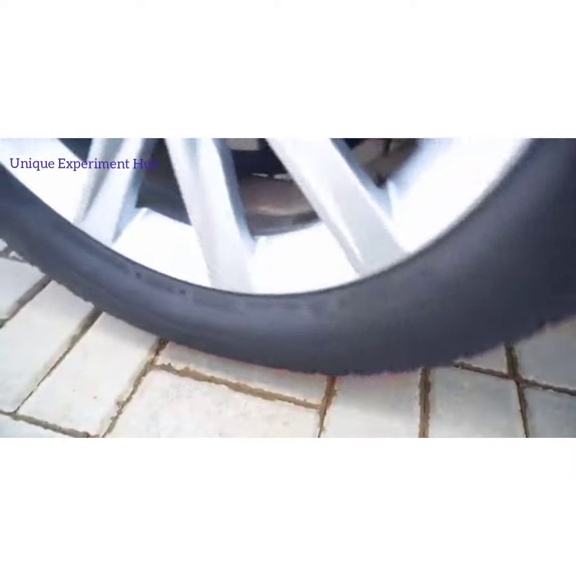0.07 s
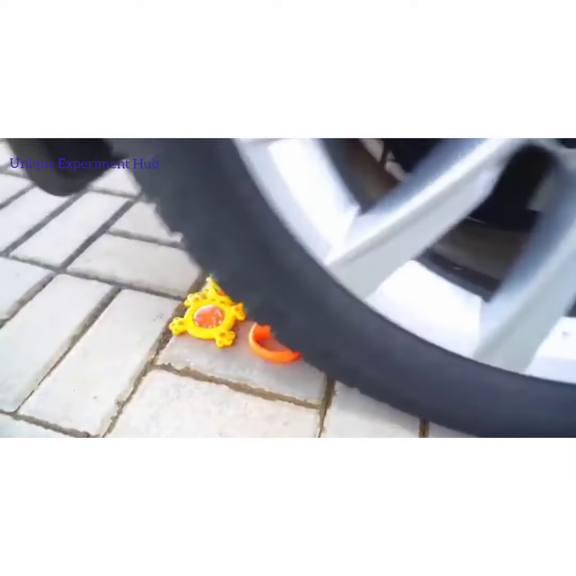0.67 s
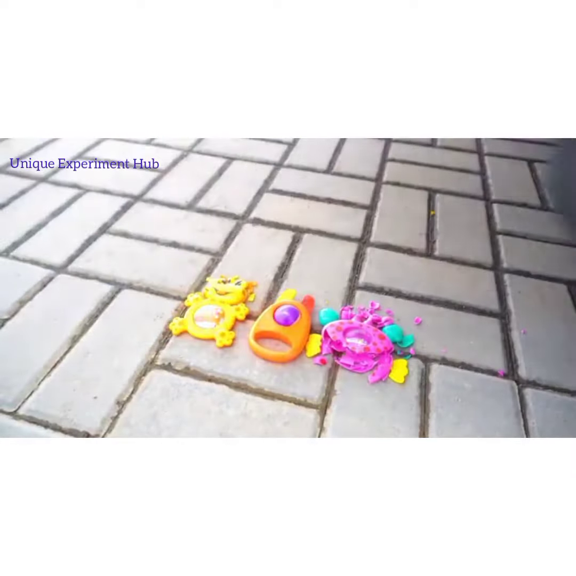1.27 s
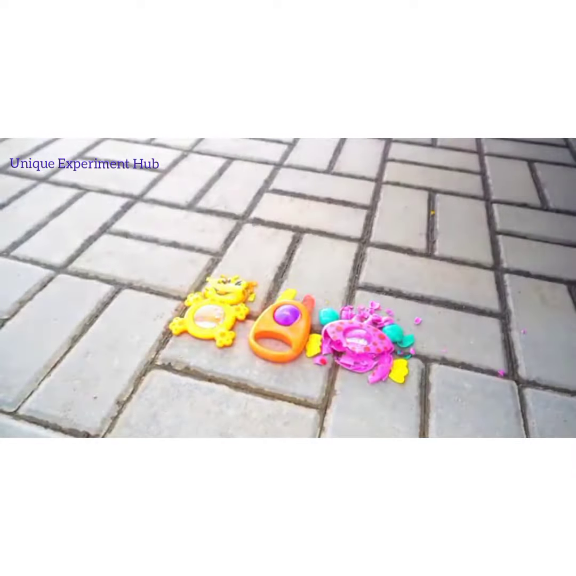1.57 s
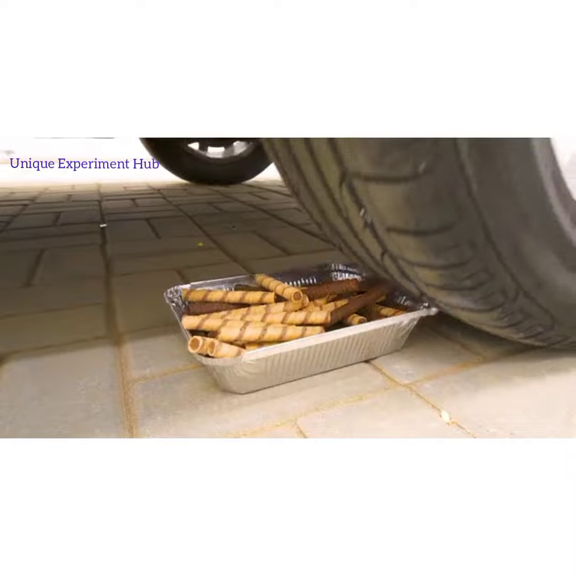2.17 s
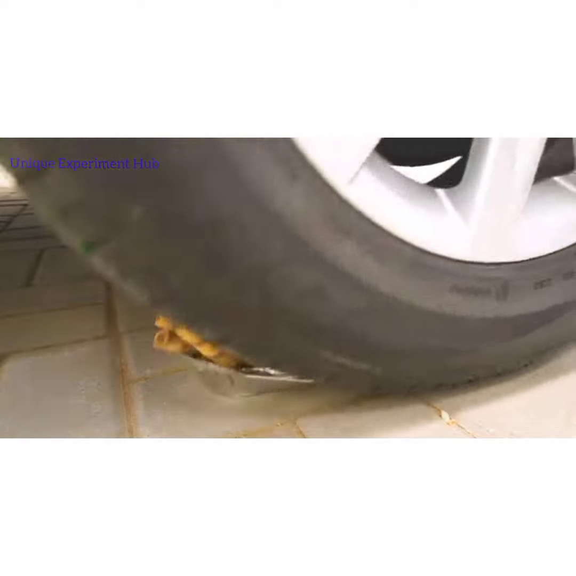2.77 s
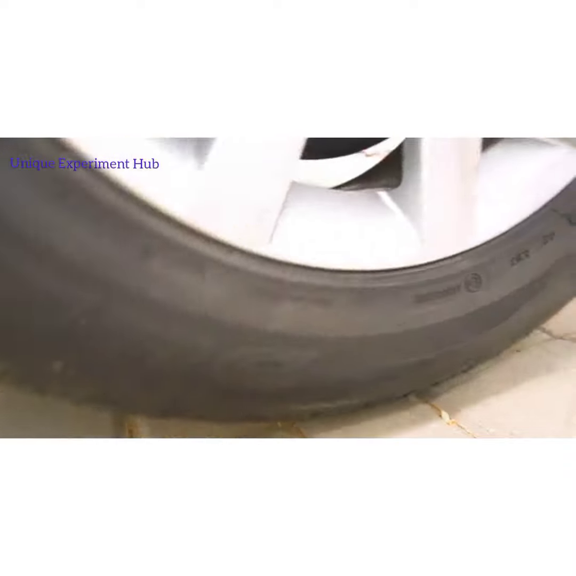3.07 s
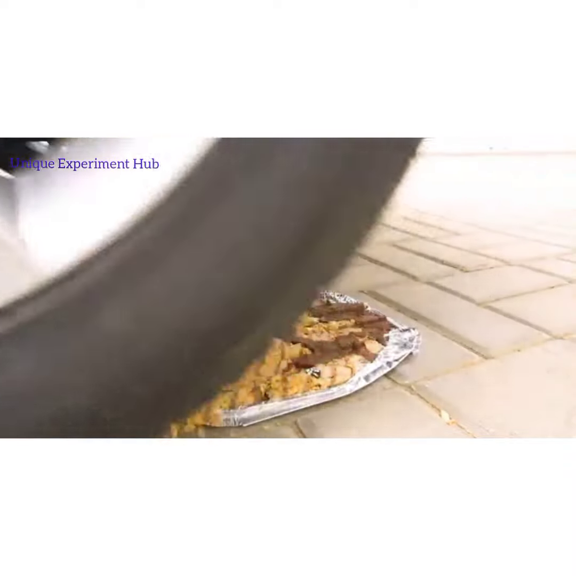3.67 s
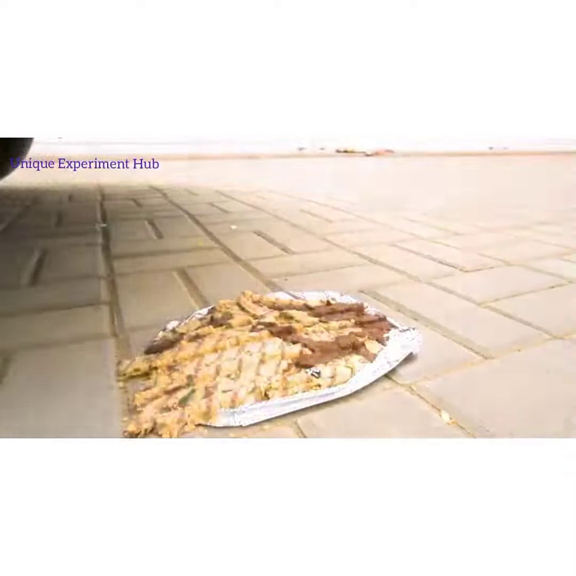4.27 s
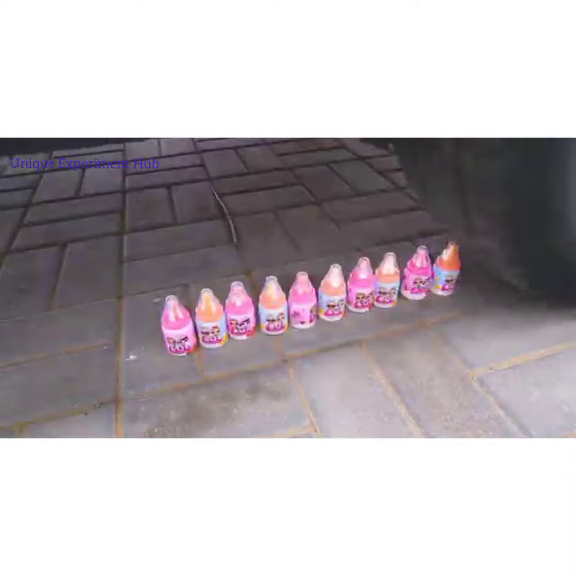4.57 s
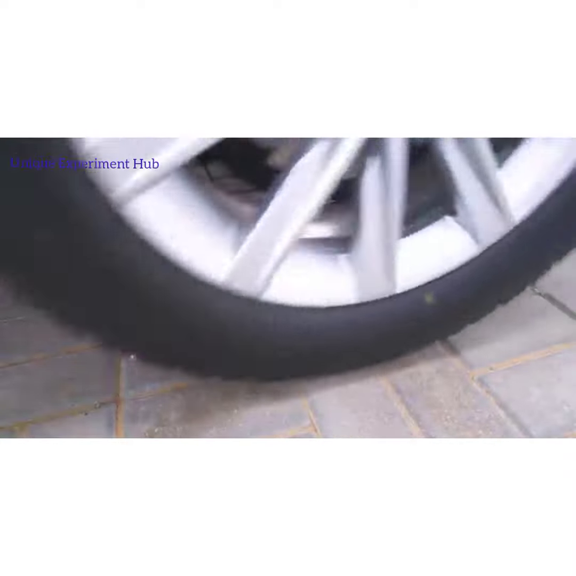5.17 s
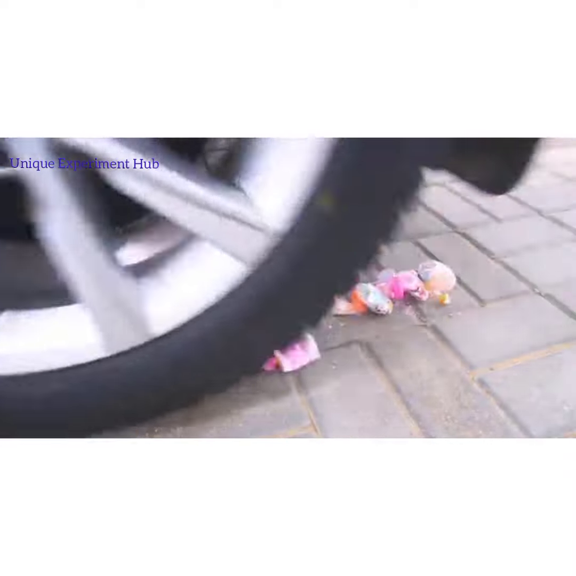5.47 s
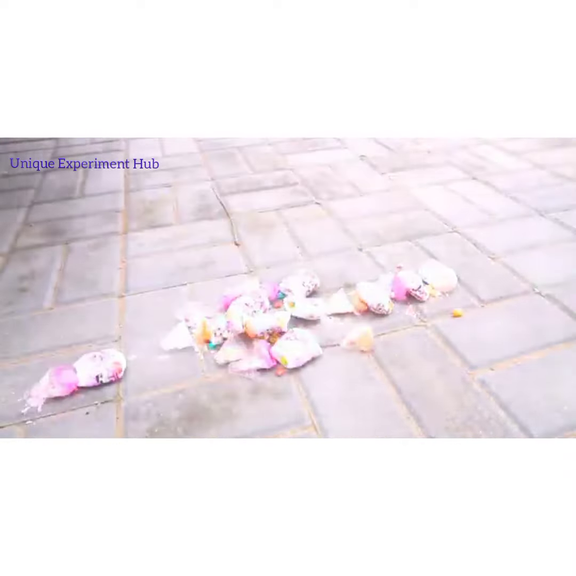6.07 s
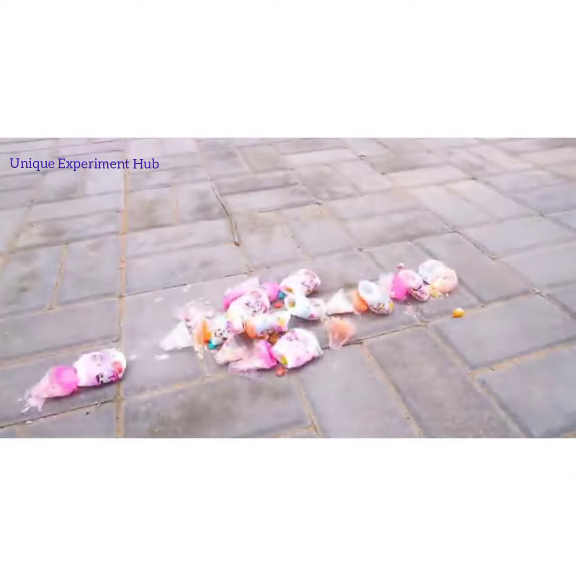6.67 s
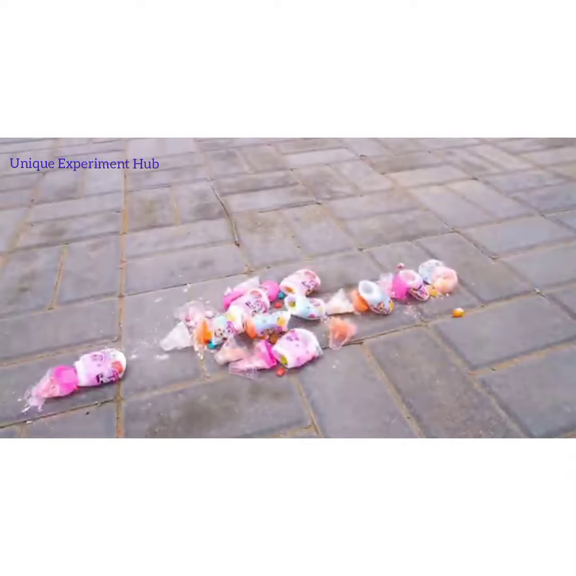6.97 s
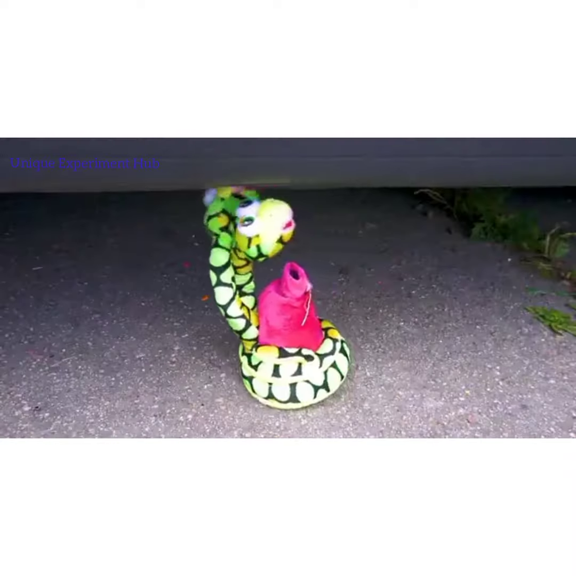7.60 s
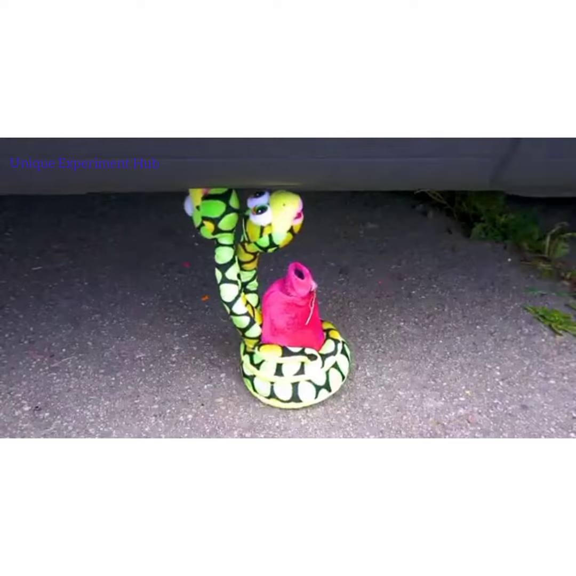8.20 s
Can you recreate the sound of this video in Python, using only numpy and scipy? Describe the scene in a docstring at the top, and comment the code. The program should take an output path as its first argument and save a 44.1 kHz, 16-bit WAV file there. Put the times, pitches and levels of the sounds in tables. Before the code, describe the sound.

A slowly rolling car tyre crushes plastic toys, wafers and small bottles with crunches, snaps and pops over a throbbing engine.

```python
"""Car crushing things on paving

Four short scenes beside a creeping tyre: hard plastic toys shatter, wafer rolls crunch in a foil tray,
small plastic bottles pop, then the car idles. Countless small fractures ring the fragments, walls split
with a snap, and the air in a bursting bottle booms. The four-cylinder engine throbs and ticks throughout;
the loudest snaps overload the microphone."""
import sys
import numpy as np
from scipy import signal
from scipy.fft import rfft, irfft, next_fast_len
from scipy.io import wavfile
from scipy.ndimage import uniform_filter1d

SR = 44100
rng = np.random.default_rng(int(sys.argv[2]) if len(sys.argv) > 2 else 0)


def output_pcm(signal):
    """Save a mono or channel-first signal as 16-bit PCM at the path in sys.argv[1].

    Samples are clipped to [-1, 1] before scaling.
    """
    pcm = np.clip(np.atleast_2d(signal).T, -1, 1) * 32767
    wavfile.write(sys.argv[1], SR, np.round(pcm).astype(np.int16))


N = 367794
TIME = np.arange(N) / SR

# (start [s], end [s], fade [s], treble limit [Hz], overload ceiling [linear])
SCENES = [(-.01, 1.782, .003, 15600, .84), (1.96, 4.37, .06, 11100, .72), (4.495, 7.09, .035, 11100, .7),
          (7.205, 8.4, .05, 11100, .75)]
# engine per scene: (start [s], end [s], first bay level [dB], last bay level [dB], exhaust overtones [dB])
ENGINE = [(0, 1.9, -19, -22.5, -27.5), (1.95, 4.48, -23, -33.5, -35), (4.48, 7.1, -26, -31.5, -38.5),
          (7.201, 8.465, -24, -23.5, -26)]
# one press, over the bottles: (start [s], until [s], rise [s], settling [s], extra firings [1/s])
THROTTLE = (4.5, 6.06, .22, .22, 11.2)
# hard plastic spectrum: (frequency [Hz], level [dB])
TOYS_COLOUR = [(59, -25), (100, -12), (169, 1.5), (201, 3), (258, 0), (347, -2), (487, -0.5), (576, 2),
               (879, -2), (1550, -11.5), (3690, -18.5), (6390, -22.5), (8770, -30.5), (11800, -36.5),
               (15500, -44)]


def crush(load, colour, per_s, spread_db, cycles, ring_db, wedge_db, crunch_db, splinter_db):
    """Countless small fractures under the tyre, each ringing the fragments with strengths of its own."""
    # load: (start [s], until [s], attack [s], crunch release [s], splinter release [s],
    #        crunch [dB], splinter [dB], crunch sag [dB], splinter gain [dB], air wedge [Hz])
    effort = rolling_over(*load)
    span, out = span_of(effort), np.zeros(N)
    size = span.stop - span.start
    at = np.flatnonzero(rng.random(size) < per_s * from_db(3 * drift(70)[span]) / SR)
    force = from_db(spread_db * np.minimum(rng.exponential(1, len(at)), 4))
    rings = np.zeros(size)
    for hz in np.geomspace(110, 15000, 44):
        cracks = np.zeros(size)
        cracks[at] = force * rng.standard_normal(len(at))
        rings += resonance(cracks, hz, hz / cycles)
    # each fracture leaves a short diffuse wash beneath the car
    pole = np.exp(-1 / (0.0097 * SR))
    wash = np.sqrt(signal.lfilter([1 - pole], [1, -pole], rings ** 2)) * rng.standard_normal(size)
    rings = rms_one(rings + from_db(-5) * wash)
    rings = coloured(rings + from_db(ring_db) * fragments(size), colour)
    *levels_db, wedge_hz = in_time(effort)
    rings += from_db(wedge_db) * moving_resonance(rings, wedge_hz[span], q=1.8)
    # rubber muffles what breaks beneath it; splinters at its edge stay bright
    parts = band(rings, 2200, "low", order=3), band(rings, 2200, "high", order=3)
    for part, curve_db, trim_db in zip(parts, levels_db, (crunch_db, splinter_db)):
        even = part / np.sqrt(np.abs(uniform_filter1d(part ** 2, size=2000)) + 1e-18)
        out[span] += even * from_db(curve_db[span] + trim_db)
    return out


def rolling_over(start_s, until_s, attack_s, crunch_release_s, splinter_release_s,
                 crunch_db, splinter_db, sag_db, gain_db, wedge_hz):
    """The tyre bears down, holds, rolls off: (time [s], crunch [dB], splinter [dB], air wedge [Hz])."""
    s = np.linspace(start_s - 2 * attack_s, until_s + 2 * max(crunch_release_s, splinter_release_s), 400)
    flattened = np.clip((s - start_s) / (until_s - start_s), 0, 1)
    crunch = crunch_db - sag_db * flattened + hold_db(s, start_s, until_s, attack_s, crunch_release_s)
    splinter = splinter_db + gain_db * flattened
    splinter += hold_db(s, start_s, until_s, attack_s / 1.53, splinter_release_s)
    wedge = wedge_hz * 1.515 ** flattened  # pitch rises as the gap between tread and paving closes
    return np.transpose([s, crunch, splinter, wedge])


def fragments(size, per_s=900, cycles_at_1khz=24):
    """Loose pieces ring, each at its own pitch, the small ones briefly and sharply."""
    out, t = np.zeros(size + SR // 20), TIME[:SR // 20]
    for place, pitch, softness in rng.random((int(per_s * size / SR), 3)):
        hz, at = 450 * 28 ** pitch, int(place * size)
        t60_s = cycles_at_1khz * np.sqrt(hz / 1000) / hz
        out[at:at + len(t)] += hz * from_db(-12 * softness - 60 * t / t60_s) * np.sin(2 * np.pi * hz * t)
    return rms_one(out[:size])


def toys():
    """Hard plastic shatters under the tread."""
    loads = [(0, 0.49, .05, .03, .03, -10, -18.5, 10.5, 1, 642),
             (.53, .81, .014, .75, 0.044, -11.5, -24, 6, 4.5, 613.6)]  # columns: see crush
    return sum(crush(load, TOYS_COLOUR, per_s=2800, spread_db=2.5, cycles=8.8, ring_db=-3.5,
                     wedge_db=-0.5, crunch_db=-1.5, splinter_db=-2) for load in loads)


def wafers():
    """Wafer rolls crunch in a foil tray."""
    loads = [(2.36, 2.97, .25, 0.458, .62, -19.3, -23.7, -0.3, 1.5, 673),
             (3.388, 3.468, .04, 0.17, 0.069, -26.5, -34.5, 6, -9, 820)]  # columns: see crush
    colour = [(120, -39), (200, -3.5), (331, -29), (366, -3.5), (595, -3), (1030, -3), (2160, -6.5),
              (5090, -6.5), (6330, -13), (9000, -14), (11000, -22)]  # (frequency [Hz], level [dB])
    return sum(crush(load, colour, per_s=1900, spread_db=1.6, cycles=5.5, ring_db=-9,
                     wedge_db=-1.5, crunch_db=1.5, splinter_db=0.99) for load in loads)


def bottles():
    """Bottles crumple under the front of the tread, and again as its rear edge lifts."""
    loads = [(4.799, 5.479, .3, .1, .1, -20, -23.5, 7.5, -2.5, 724),
             (5.571, 5.728, .1, 0.31, .36, -19.5, -22, 0.39, -3, 945)]  # columns: see crush
    colour = [(53, -35.5), (90, 1.5), (209, -5.5), (307, -15), (368, -0.5), (608, -0.5), (822, -1),
              (1410, -1), (1700, -5), (2250, -3), (4630, -10.5), (5900, -17), (7360, -16.5), (9750, -22),
              (11000, -32)]  # (frequency [Hz], level [dB])
    return sum(crush(load, colour, per_s=1400, spread_db=2.0, cycles=7.05, ring_db=-3.5,
                     wedge_db=-0.5, crunch_db=1.33, splinter_db=0.66) for load in loads)


def snaps(body_q=2.9, shard_q=6.5):
    """A wall splits in a quick run of slips; its hollow booms and a shard rings in two modes."""
    # (time [s], level [dB], hollow body [Hz], treble [dB], shard [Hz], decay [s])
    splits = [(0.021, 1, 523, -23, 2400, 0.031), (0.037, -7.5, 603, -3.5, 9750, 0.0146),
              (0.062, -4, 570, -16, 7500, 0.024), (0.1246, 3, 972, -8, 8360, 0.0112),
              (0.1951, 7.5, 964, -12, 3140, 0.0244), (0.222, 0, 859, -14, 8100, 0.02),
              (0.234, -2, 950, -14.5, 9500, 0.0214), (0.251, -1, 856, -12, 8900, 0.021),
              (0.2741, -1.5, 886, -18.5, 2530, 0.033), (0.295, 2, 518, -12, 5600, 0.038),
              (0.327, -3.5, 880, -7, 3670, 0.0285), (0.376, -4.5, 1600, -3, 3590, 0.017),
              (0.399, -8, 490, -2.5, 10960, 0.026), (0.412, -3.5, 1100, -1.5, 10250, 0.021),
              (0.437, -7, 969, -3, 9500, 0.0168), (0.449, 5, 910, -11.5, 3580, 0.0156),
              (0.53, -2, 696, -16.5, 2480, 0.0246), (0.542, 7.5, 655, -16.5, 3000, 0.044),
              (0.565, -1.5, 640, -21, 2200, 0.023), (0.5895, 1.5, 796, -29, 2200, 0.022),
              (0.611, 3.5, 747, -17, 3300, 0.027), (0.624, -3, 900, -21.5, 3500, 0.014),
              (0.632, -4, 1480, -16.5, 2300, 0.0163), (0.674, 0.5, 600, -24.5, 7240, 0.021),
              (0.694, -9, 900, -5, 2900, 0.011), (0.701, -3.5, 1380, -14.5, 5670, 0.0134),
              (0.715, -3, 746, -7, 3070, 0.0234), (0.728, -8, 900, -5, 4000, 0.022),
              (0.74, -9.5, 900, -4.5, 3370, 0.0183), (0.76, 1.5, 1000, -6, 3630, 0.0287),
              (0.782, 1.5, 711, -12, 3100, 0.028), (0.801, -3.5, 523, -12.5, 3000, 0.015),
              (0.81, -3, 1240, -12, 2480, 0.017), (2.214, -6.5, 729, -16.5, 2906, 0.052),
              (2.321, -9.5, 1060, -6.5, 4550, 0.028), (2.372, -4.5, 1055, -22, 2800, 0.033),
              (2.4135, -9.5, 900, -9.5, 8880, 0.0143), (2.4625, -9.5, 560, -9.5, 2500, .014),
              (2.489, -13, 1800, -11, 7900, 0.0185), (2.5035, -14, 1101, -3.5, 3800, 0.0125),
              (2.5152, -14, 750, -14.5, 5000, .014), (2.6155, -4.5, 850, -23, 2200, 0.0166),
              (2.624, -8.5, 1100, -17.5, 2600, .016), (2.709, -11.5, 1100, -10, 3290, 0.0116),
              (2.768, -10.5, 1190, -7, 4180, 0.034), (2.797, -10, 1106, -10.5, 1800, 0.033),
              (2.812, -8, 1000, -18, 2000, 0.0144), (2.862, -3.5, 850, -22.5, 2600, 0.0134),
              (2.93, -12.5, 1140, -5.5, 3310, 0.017), (2.971, -10, 996, -23, 2500, 0.034),
              (3.157, -15, 1104, -4, 3993, 0.0214), (3.1678, -11.5, 1200, -8.5, 3500, 0.015),
              (3.395, -17.5, 995, -19.5, 2000, 0.075), (4.815, -8.5, 1140, -11.5, 2600, 0.02),
              (4.888, -3.5, 900, -16, 4300, 0.018), (4.925, -5, 1000, -22, 2500, 0.014),
              (4.941, -0.5, 1100, -10, 7500, 0.026), (4.9752, -0.5, 960, -18, 7600, 0.018),
              (4.98, -3.5, 791, -11.5, 3000, 0.025), (4.989, -5.5, 560, -18, 2500, 0.0187),
              (5.019, -3, 573, -13, 7260, 0.0315), (5.074, -7, 900, -23.5, 2500, 0.012),
              (5.099, 1, 1535, -15.5, 7380, 0.02), (5.1465, -8, 746.1, -17, 4130, 0.0077),
              (5.175, -3.5, 750, -22, 7000, .012), (5.1856, -3, 815, -14.5, 2310, 0.023),
              (5.2246, -2, 966, -21, 2300, 0.0104), (5.2303, -5, 1300, -10, 2290, 0.0098),
              (5.271, -7, 803, -8, 2970, 0.0224), (5.288, -10.5, 1510, -14, 2200, 0.0103),
              (5.329, 5, 892, -16.5, 2300, 0.035), (5.354, -4, 463, -12, 7270, 0.035),
              (5.394, -2.5, 745, -10, 3160, 0.014), (5.4187, -2, 527, -14.5, 8200, 0.0114),
              (5.442, -2.5, 664.2, -13, 3110, 0.0235), (5.487, -0.5, 1200, -9.5, 2400, 0.019),
              (5.526, -12.5, 872, 1, 3340, 0.0071), (5.586, -4, 1370, -14.5, 6300, 0.027),
              (5.71, -9.5, 850, -22, 2500, 0.0147), (5.735, -6.5, 1292, -25.5, 2500, 0.018)]
    out, t = np.zeros(N), TIME[:SR // 12]
    knots_s = t[::40]
    for s, db, body_hz, treble_db, shard_hz, t60_s in splits:
        slips = rng.standard_normal((3, len(t)))
        slips *= from_db(3 * np.interp(t, knots_s, rng.standard_normal(len(knots_s))))
        decay = from_db(-60 * t / t60_s)
        split = slips[0] * decay + 12 * signal.unit_impulse(len(t))  # first slip is the largest
        body = rms_one(resonance(band(split, 5200, "low"), body_hz, body_hz / body_q))
        shard = rms_one(resonance(slips[1] * decay ** 1.3, shard_hz, shard_hz / shard_q))
        second_hz = rng.uniform(4000, 10500)
        second = rms_one(resonance(slips[1] * decay ** 2, second_hz, second_hz / shard_q))
        tear = rms_one(band(slips[2], [1500, 9500], "band") * decay ** 1.8)
        bright = from_db(-14) * shard + from_db(-24.5) * second + from_db(-16) * tear
        add(out, s, from_db(db) * (from_db(-19.5) * body + from_db(treble_db) * bright))
    return under_car(out, wet_db=-7.5, t60_s=0.12)


def pops(gain_db=1.0, rise=0.23, cycles=5):
    """A burst swings the air in a bottle for a few cycles, rising in pitch as the bottle shrinks."""
    bursts = [(4.991, -18, 520), (5.02, -13, 450), (5.1851, 5.5, 372), (5.2225, -5.5, 420),
              (5.27, 2.5, 420), (5.329, 4, 564), (5.356, -9.5, 450), (5.395, -4, 450), (5.4183, -4, 460),
              (5.4427, 0.5, 446), (5.71, -5.5, 440)]  # (time [s], level [dB], starting pitch [Hz])
    out, t = np.zeros(N), TIME[:SR // 20]
    for s, db, hz in bursts:
        spent = t * hz / cycles
        turns = np.cumsum(hz * (1 + rise * np.minimum(spent, 1))) / SR
        add(out, s, -from_db(db + gain_db - 60 * spent) * np.sin(2 * np.pi * turns))
    return under_car(out, wet_db=-9, t60_s=0.078)


def thuds(per_s=140):
    """Puffs of air from the bottles come through the rubber as low, lumpy thumps."""
    envelope = (4.5, 5.5, 0.12, 0.33, -25)  # (start [s], until [s], attack [s], release [s], level [dB])
    *timing, level_db = envelope
    puffs = (rng.random(N) < per_s / SR) * rng.choice([-1, 1], N)
    return rms_one(band(puffs, [90, 420], "band")) * from_db(level_db - 2 + hold_db(TIME, *timing))


def settling():
    """Broken toys spring back as the tread leaves them."""
    load = (.83, .89, .04, .28, .2, -20, -24, 3, -8, 800)  # columns: see crush
    return crush(load, TOYS_COLOUR, per_s=1300, spread_db=1.8, cycles=7, ring_db=-7,
                 wedge_db=-4, crunch_db=1.5, splinter_db=0.8)


def grit():
    """The tyre rolls away over fine grit, then a coarser patch."""
    loads = [(6.581, 6.762, .1, .1, 0.092, -32.5, -40, 0.86, 1.8, 900),
             (6.801, 6.833, .1, .35, .35, -29.5, -29, 1, -0.69, 900)]  # columns: see crush
    colour = [(350, -33), (600, 8.5), (919, 7), (1220, -1), (1340, 4.5), (1460, -6), (4360, -15),
              (5910, -14), (11000, -35)]  # (frequency [Hz], level [dB])
    return sum(crush(load, colour, per_s=5000, spread_db=-1.0, cycles=6.2, ring_db=-7,
                     wedge_db=4, crunch_db=-1.0, splinter_db=3.0) for load in loads)


def ticks():
    """Broken plastic and small stones tick, ringing for a cycle or two."""
    events = [(0.827, -7, 8000), (0.867, -15, 8800), (0.893, -16, 8400), (5.851, -12.5, 8900),
              (5.929, -2, 1830), (5.931, -0.5, 7600), (6.395, -17.5, 8000), (6.836, -12.5, 8000),
              (7.611, -1, 1346), (8.265, -11, 1400)]  # (time [s], peak [dB], pitch [Hz])
    out, impulse = np.zeros(N), signal.unit_impulse(SR // 50)
    for s, db, hz in events:
        tick = resonance(resonance(impulse, hz, 0.563 * hz), hz, 0.78 * hz)
        add(out, s, from_db(db) * tick / np.abs(tick).max())
    return under_car(out, wet_db=-7, t60_s=0.034)


def clicks():
    """Dull clicks: a spike, then one low swing."""
    events = [(1.715, 2.5), (1.768, -4), (1.78, 3)]  # (time [s], level [dB])
    out, t = np.zeros(N), TIME[:SR // 20]
    spike = np.cos(2 * np.pi * 700 * t) * np.exp(-t / 0.000297)
    swing = np.cos(2 * np.pi * 70 * t) * np.exp(-t / 0.0097)
    for s, db in events:
        add(out, s, from_db(db) * (spike - .5 * swing))
    return out


def throttle():
    """Throttle opening, 0-1: rises, holds, settles back."""
    start_s, until_s, rise_s, settling_s, _ = THROTTLE
    return np.clip((TIME - start_s) / rise_s, 0, 1) * np.exp(-np.maximum(TIME - until_s, 0) / settling_s)


def firings():
    """Firing count in each scene; the throttle speeds it up."""
    rhythm = [(1.007, 27.3), (2.082, 27.55), (6.605, 27.3), (7.491, 27.3)]  # per scene: (time of an injector tick [s], firings off throttle [1/s])
    out = np.zeros(N)
    for (start_s, *_), (tick_s, per_s) in zip(SCENES, rhythm):
        turns = np.cumsum(per_s + THROTTLE[-1] * throttle()) / SR
        out = np.where(TIME >= start_s, turns - np.interp(tick_s, TIME, turns) + .5, out)
    return out


def exhaust(turns, lag_firings=.31):
    """Each firing pushes one soft pulse out of the pipe."""
    harmonics = [(2, -0.5), (3, -17), (4, -8), (5, -18.5), (6, -21.5), (7, -22), (8, -21)]  # (multiple of the firing rate, level [dB])
    throb = [
        [(0.0, -17.5), (0.056, -15.5), (0.464, -11.5), (0.496, -20.5), (0.866, -10.5), (1.67, -5), (1.7, -8.5)],
        [(2.05, -19), (2.28, -18), (2.66, -27), (2.95, -21), (3.56, -18.5), (4.17, -12.5), (4.28, -13.5)],
        [(4.55, -21), (4.77, -19), (4.94, -32.5), (5.45, -40), (5.64, -24.5), (6.29, -15), (7.03, -22)],
    ]  # fundamental, one curve per pass: (time [s], level [dB])
    throb_db, = in_time(np.concatenate(throb))
    overtones_db, = in_time([(s, row[-1]) for row in ENGINE for s in row[:2]])
    phase = 2 * np.pi * (turns - lag_firings)
    overtones = sum(from_db(db + 1.9 * drift(17)) * np.cos(k * phase) for k, db in harmonics)
    return -np.sqrt(2) * (from_db(throb_db) * np.cos(phase) + from_db(overtones_db) * overtones)


def engine_bay(turns, setting, spectrum, clatter_db, tick_db):
    """Mechanical noise swells with every firing, injectors tick, and both ring in the casing."""
    casing = [(393.3, 220, -1.5), (839, 35, -1.5), (1254.3, 66, 6), (1562, 180, -4.5), (2002.5, 48, 1),
              (2957, 210, -4), (3236, 90, 1.5), (4762, 160, 2.5), (6190, 160, -6.5), (7650, 120, -5.5),
              (8130, 220, -8.5)]  # modes: (frequency [Hz], width [Hz], gain [dB])
    start_s, end_s, first_db, last_db, _ = setting
    level = [(start_s, first_db), (end_s, last_db)]
    span, out = span_of(level), np.zeros(N)
    turns = turns[span]
    noise = rng.standard_normal((2, len(turns)))
    swell = from_db(clatter_db * (-np.cos(2 * np.pi * turns) + .5 * drift(90)[span]))
    firing, phase = np.divmod(turns + .5, 1)
    alternate_db = 5 * (firing % 2 - .5)
    scatter_db = 2 * rng.standard_normal(400)[firing.astype(int)]
    tick = from_db(tick_db + alternate_db + scatter_db) * np.exp(-phase / 0.054)
    drive = noise[0] * swell + band(noise[1] * tick, [900, 5000], "band", order=1)
    rung = drive + sum(from_db(db) * resonance(drive, hz, width_hz) for hz, width_hz, db in casing)
    out[span] = rms_one(coloured(rung, spectrum)) * from_db(in_time(level)[0][span])
    return out


def engine(turns, throttle_db=2.5):
    """Bay noise through the four scenes, louder under throttle."""
    # bay spectra: (frequency [Hz], level [dB])
    bay_toys = [(41, -43.5), (70, 2.5), (220, -8.5), (337, -0.5), (483, -9), (647, -3.5), (1130, -11),
                (1240, -13), (1390, -19), (1590, -15.5), (3560, -27), (6390, -31.5), (15000, -59.5)]
    bay_wafers = [(41, -29.5), (70, -1.5), (141, -8.5), (185, -12.5), (335, -3), (523, -16), (749, -8),
                  (1030, -16), (1220, -16), (1470, -19.5), (1780, -19), (2160, -21), (10300, -40),
                  (11000, -70)]
    bay_bottles = [(41, -20), (70, 4), (114, -10), (189, -6), (271, -9), (405, -5.5), (480, -12),
                   (945, -7.5), (1330, -18), (1540, -14), (8530, -32), (11000, -43)]
    bay_idle = [(41, -26), (70, -3.5), (114, -11.5), (219, -10.5), (380, -5), (545, -8.5), (832, -10),
                (986, -13), (1270, -13), (1440, -17), (1980, -16.5), (4820, -26), (6400, -27.5),
                (7150, -35), (8010, -30.5), (11000, -47)]
    revving = from_db(throttle_db * throttle())
    return (engine_bay(turns, ENGINE[0], bay_toys, clatter_db=0.5, tick_db=-1.5)
            + engine_bay(turns, ENGINE[1], bay_wafers, clatter_db=1.51, tick_db=-1)
            + engine_bay(turns, ENGINE[2], bay_bottles, clatter_db=1.39, tick_db=0) * revving
            + engine_bay(turns, ENGINE[3], bay_idle, clatter_db=2.3, tick_db=5.5))


def idle_moan(first_s=7.283, period_s=.146, width_s=.017, hz=420, rise_hz=30):
    """At idle a short, rough, rising moan with a faint hiss returns every four firings."""
    since_s = (TIME - first_s + period_s / 2) % period_s - period_s / 2
    swell = np.exp(-(since_s / width_s) ** 2) * (TIME > first_s - period_s / 2)
    moan = tone(hz + rise_hz * np.tanh(since_s / width_s) + 7 * drift(7), waver_hz=5.94)
    moan *= 1 + .25 * drift(160)  # roughness
    hiss = rms_one(band(rng.standard_normal(N), [5500, 10000], "band"))
    return swell * (from_db(-19.3) * moan + from_db(-46) * hiss)


def idle_tones(firing_hz=27.3):
    """Steady engine tones in the last scene."""
    harmonics = [(13, -34), (22, -42), (28, -42), (30, -36), (33, -42), (46, -42)]  # (multiple of the firing rate, level [dB])
    idling = TIME > ENGINE[-1][0]
    return idling * sum(from_db(db) * tone(k * firing_hz, waver_hz=3.957) for k, db in harmonics)


def hum(hz=203.1):
    """A low hum while the toys are crushed."""
    swells = [(0, 0.382, .05, 0.068, -24.5), (0.533, 0.874, .03, 0.137, -20.5)]  # (start [s], until [s], attack [s], release [s], level [dB])
    envelope = sum(from_db(db + hold_db(TIME, *timing)) for *timing, db in swells)
    return tone(hz, waver_hz=1.8) * from_db(1.8 * drift(22)) * envelope


def whine(hz=10008, level_db=-65.5):
    """A thin, steady whine."""
    return from_db(level_db) * tone(hz, waver_hz=8.8)


def under_car(x, wet_db, t60_s):
    """Quick reflections between paving, wheel and floor pan."""
    t = TIME[:SR // 5]
    tail = rng.standard_normal(len(t)) * from_db(-60 * t / t60_s) * (t > .001)
    return x + from_db(wet_db) * signal.fftconvolve(x, tail / np.linalg.norm(tail))[:len(x)]


def from_db(db):
    """Decibels to gain."""
    return 10 ** (np.asarray(db) / 20)


def rms_one(x):
    """Scale to unit power."""
    return x / np.sqrt(np.mean(x ** 2) + 1e-20)


def in_time(rows):
    """Each column of a curve at every sample."""
    s, *columns = np.transpose(rows)
    return [np.interp(TIME, s, c) for c in columns]


def span_of(rows):
    """Samples that a curve covers."""
    return slice(max(int(rows[0][0] * SR), 0), min(int(rows[-1][0] * SR), N))


def hold_db(s, start_s, until_s, attack_s, release_s):
    """0 dB while held; -20 dB one attack before and one release after."""
    away = np.maximum((start_s - s) / attack_s, 0) + np.maximum((s - until_s) / release_s, 0)
    return -20 * away ** 1.503


def drift(rate_hz):
    """Random wander of unit power."""
    knots = rng.standard_normal(int(N / SR * rate_hz) + 2)
    return rms_one(np.interp(TIME * rate_hz, np.arange(len(knots)), knots))


def tone(hz, waver_hz):
    """Wavering sine of unit power."""
    return np.sqrt(2) * np.sin(2 * np.pi * np.cumsum(hz + waver_hz * drift(25)) / SR)


def coloured(x, spectrum):
    """Apply a spectrum joined in log frequency, cut steeply below its first point."""
    hz, db = np.transpose(spectrum)
    size = next_fast_len(len(x))
    bins_hz = np.maximum(np.fft.rfftfreq(size, 1 / SR), 1)
    gain = from_db(np.interp(np.log(bins_hz), np.log(hz), db)) / np.sqrt(1 + (hz[0] / bins_hz) ** 6)
    return irfft(rfft(x, size) * gain, size)[:len(x)]


def band(x, hz, kind, order=2):
    """Butterworth filter."""
    return signal.sosfilt(signal.butter(order, hz, kind, fs=SR, output="sos"), x + 1e-18)


def resonator(hz, width_hz):
    """Two-pole band-pass coefficients, unit peak gain."""
    r = np.exp(-np.pi * width_hz / SR)
    return np.array([1, 0, -1]) * (1 - r * r) / 2, [1, -2 * r * np.cos(2 * np.pi * hz / SR), r * r]


def resonance(x, hz, width_hz):
    """One steady resonance."""
    return signal.lfilter(*resonator(hz, width_hz), x + 1e-18)


def moving_resonance(x, hz, q):
    """A resonance retuned every short block."""
    out, state = np.zeros(len(x)), np.zeros(2)
    for i in range(0, len(x), 128):
        block = slice(i, i + 128)
        out[block], state = signal.lfilter(*resonator(hz[i], hz[i] / q), x[block], zi=state)
    return out


def add(out, s, sound):
    """Mix a short sound in at a time."""
    at = max(round(s * SR), 0)
    out[at:at + len(sound)] += sound[:N - at]


def scene():
    """Crushed things and car in mono; all but the exhaust drops out once, briefly."""
    dropout = (.454, .522)  # (start [s], end [s])
    turns = firings()
    car = engine(turns) + idle_moan() + idle_tones() + hum() + whine()
    things = toys() + wafers() + bottles() + grit() + settling()
    things += snaps() + pops() + thuds() + ticks() + clicks()
    gate = np.clip(np.maximum(dropout[0] - TIME, TIME - dropout[1]) / .002, 0, 1)
    return (exhaust(turns) + gate * (car + things))[None]


def record(dry):
    """Each scene overloads at its own ceiling, fades in and out and has its own treble limit."""
    out, cutoff_hz = np.zeros_like(dry), 15900
    for start_s, end_s, fade_s, top_hz, ceiling in SCENES:
        limited = dry / (1 + (dry / ceiling) ** 6) ** (1 / 6)
        window = np.clip(np.minimum(TIME - start_s, end_s - TIME) / fade_s, 0, 1)
        lowpass = signal.ellip(10, .2, 70, top_hz, fs=SR, output="sos")
        out += signal.sosfilt(lowpass, limited * window + 1e-18)
    return signal.sosfilt(signal.ellip(10, .2, 80, cutoff_hz, fs=SR, output="sos"), out)


dry = scene()
out = record(dry)
output_pcm(out)
```